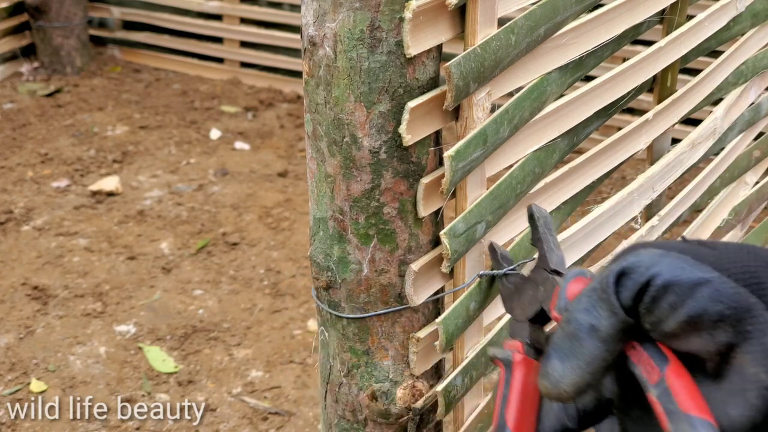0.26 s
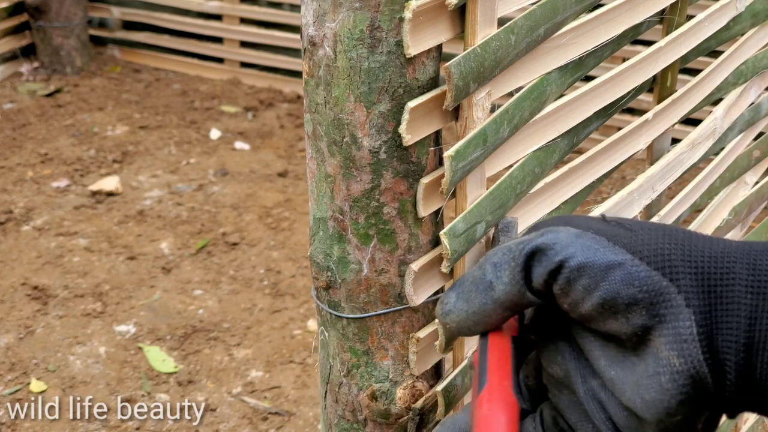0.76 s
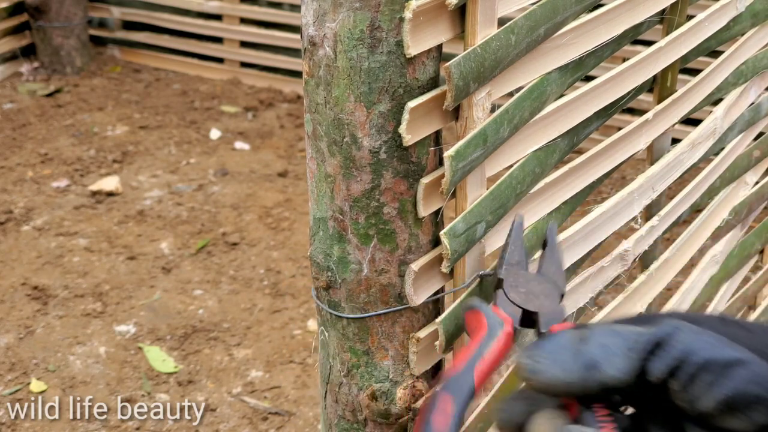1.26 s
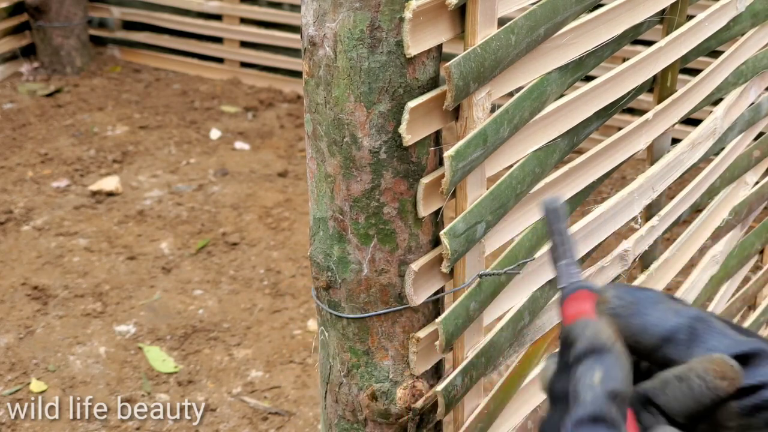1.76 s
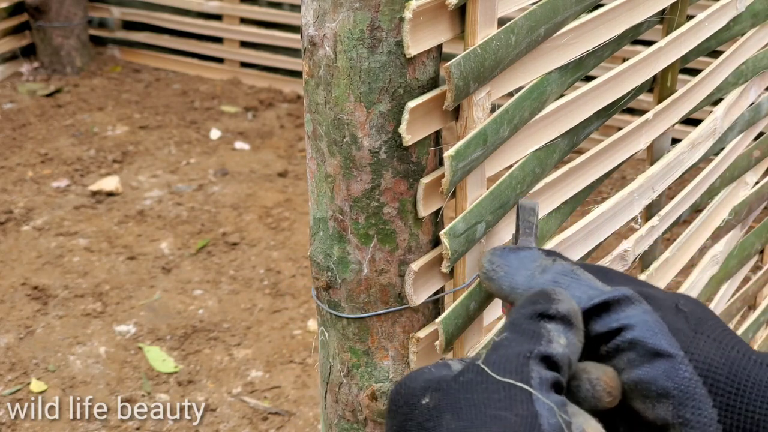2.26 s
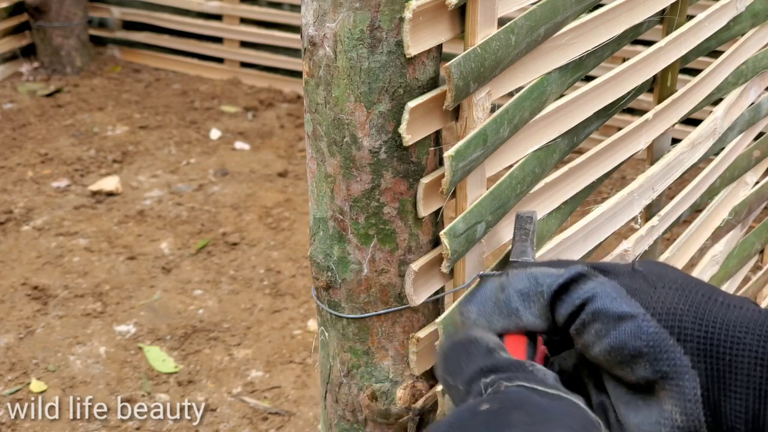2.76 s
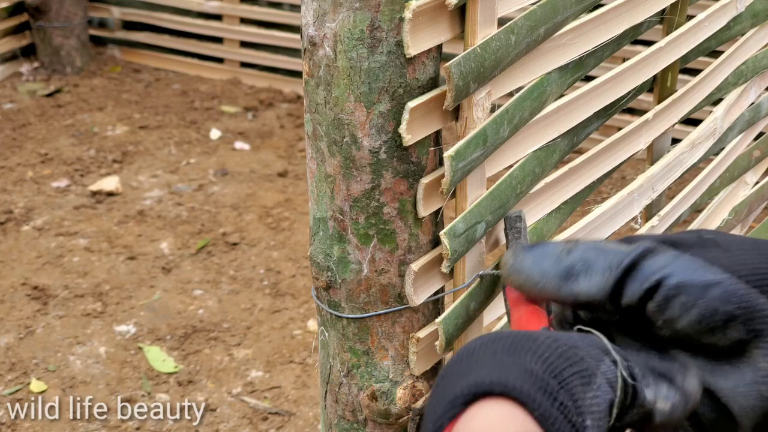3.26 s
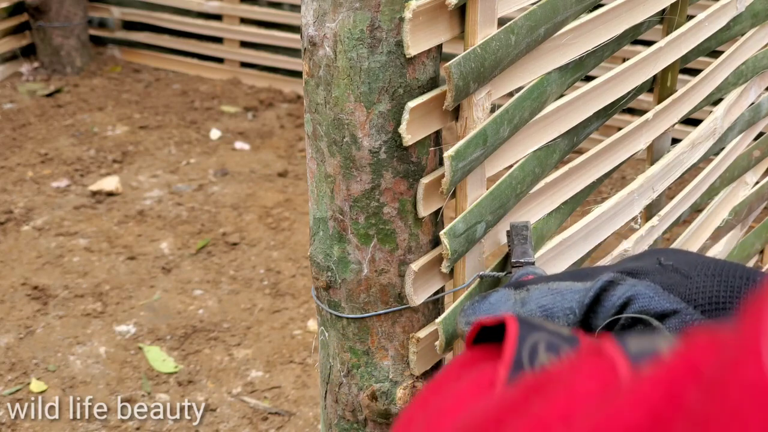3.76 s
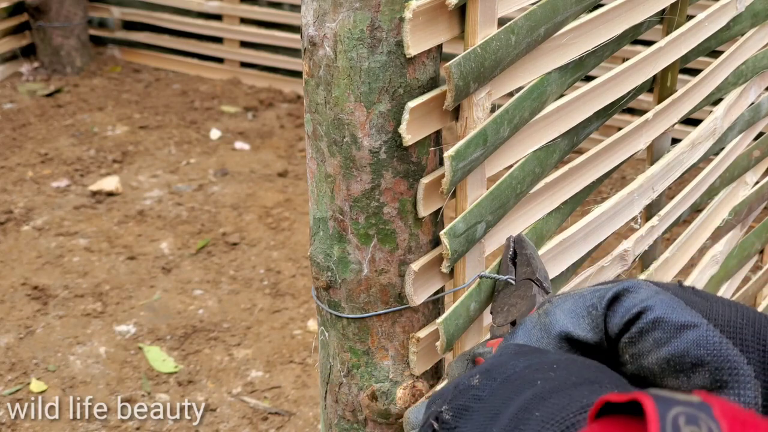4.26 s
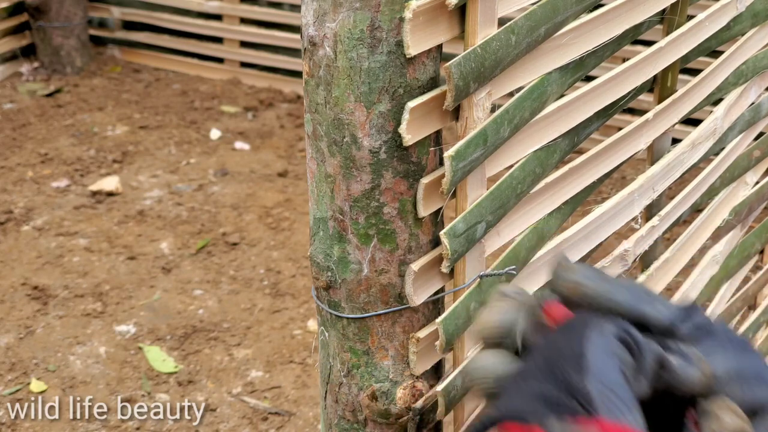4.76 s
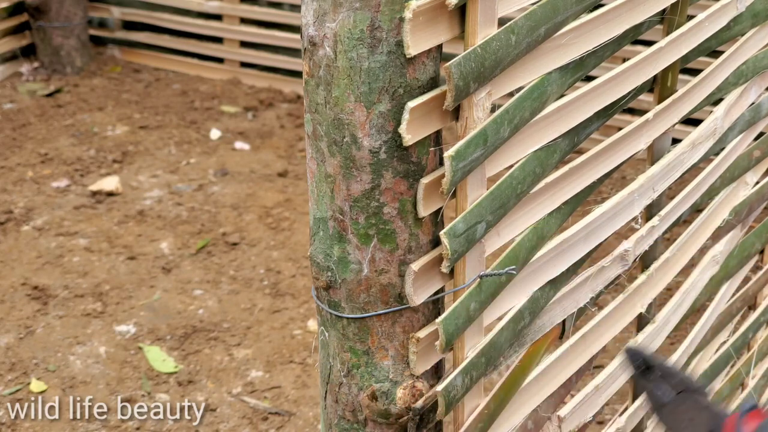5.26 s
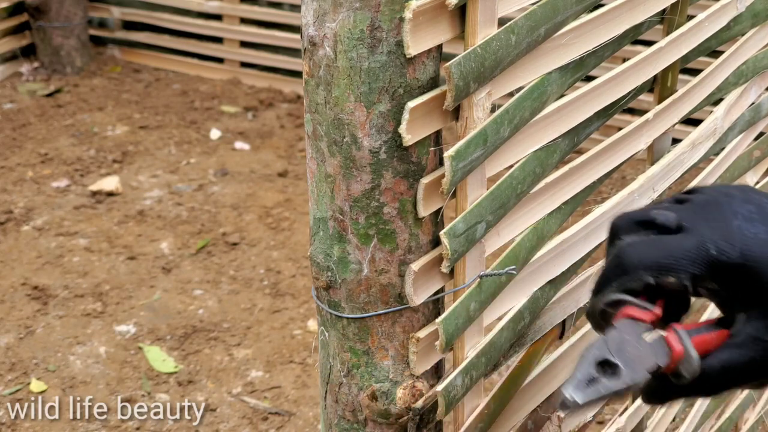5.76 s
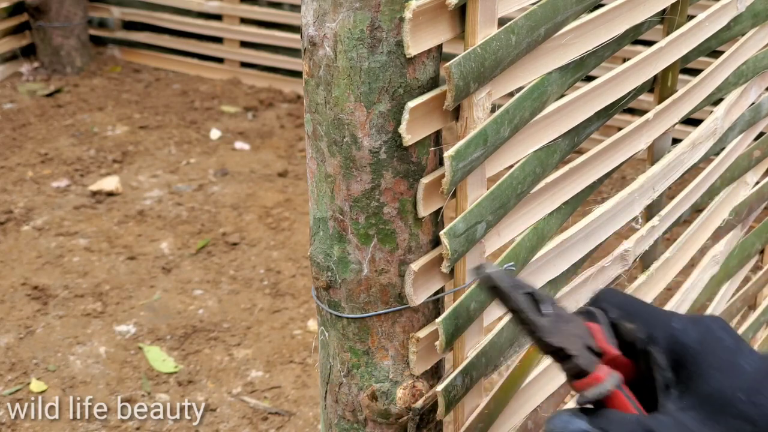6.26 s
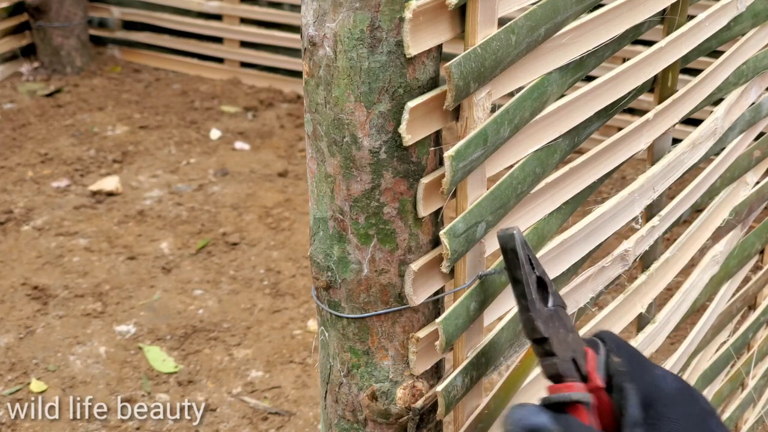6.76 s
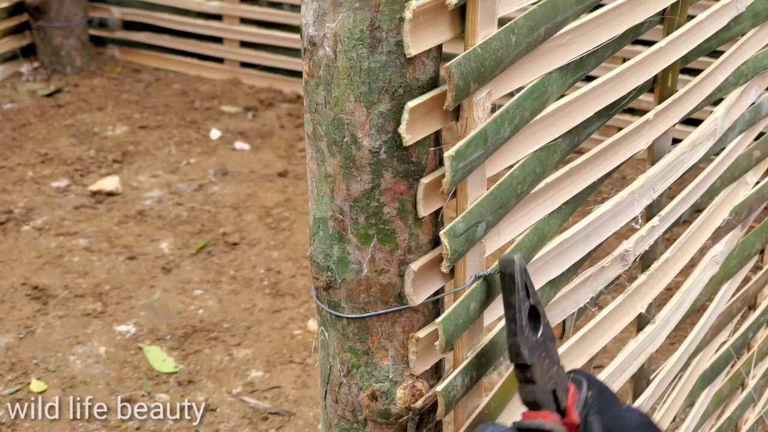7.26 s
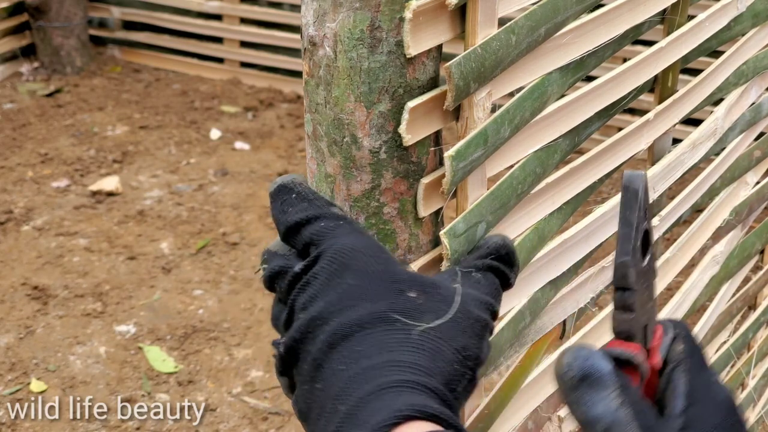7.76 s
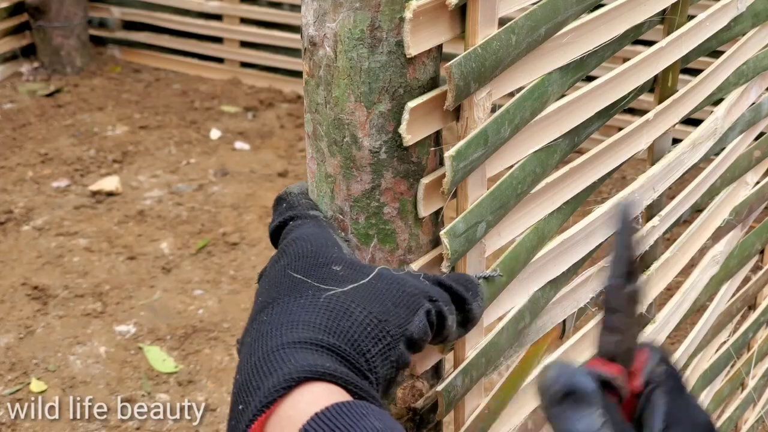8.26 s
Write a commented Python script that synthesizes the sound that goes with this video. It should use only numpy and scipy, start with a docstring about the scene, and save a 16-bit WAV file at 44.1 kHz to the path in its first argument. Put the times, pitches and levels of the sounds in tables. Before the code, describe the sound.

Faint metallic wire-twisting ticks and glove rubs, two bright snaps, a pause, then bouncing plier taps on hollow bamboo, with crickets behind.

```python
"""Outdoors, by a tree trunk: pliers grip and twist steel wire that ties a split-bamboo panel to the tree,
slip off with two clicks, then tap the twisted end down; taps bounce, clack on the slats and thud the panel.
Each contact mixes ringing tones with noise sent through resonances of bamboo and steel.
Gloves rub on the handles as crackling, coloured noise, and soft low pushes stir the panel.
Two crickets and a far bird chirp with short sagging tones in the steady hiss of shaped noise."""
import sys
import numpy as np
from scipy import signal
from scipy.fft import rfft, irfft, next_fast_len
from scipy.io import wavfile
from scipy.ndimage import map_coordinates

SR = 44100
rng = np.random.default_rng(int(sys.argv[2]) if len(sys.argv) > 2 else 0)


def dump_mix(stems):
    """Bounce the given channels to the path in sys.argv[1] as a 16-bit WAV at rate SR."""
    frames = np.atleast_2d(stems).T  # one column per channel
    limited = np.clip(frames, -1, 1)  # hard clip at full scale
    pcm = np.round(limited * 32767).astype(np.int16)
    wavfile.write(sys.argv[1], SR, pcm)


N = 375273  # length of the scene [samples]
AGE = np.arange(SR * 45 // 100) / SR  # time since a contact began [s]

# Outdoor hiss: (frequency [Hz], level [dB per Hz, relative])
AIR_COLOUR = [(25, -22), (50, -8.5), (102, -1.5), (145, -10), (250, -11.5), (400, -7), (560, -9.5),
              (780, -6), (1080, -9.5), (1550, -5.5), (2900, -8.5), (4400, -13), (9000, -24.5),
              (15500, -25.5)]
# How alike the surrounding hiss is at left and right: (frequency [Hz], likeness [-1 to 1])
AIR_ALIKE = [(60, 0.62), (130, 0.87), (290, 0.65), (640, 0.27), (1400, 0.02), (15000, 0.01)]
# Part of the hiss that comes from the right: (frequency [Hz], share of energy [0-1])
FROM_RIGHT = [(100, 0.086), (400, 0.66), (900, 0.64), (1300, 0.24), (2400, 0.12), (3500, 0.074),
              (9000, 0.034)]
AIR_DB, AIR_DRIFT_DB = -56.5, -0.14  # middle level and size of its slow drift [dB]
LEFT_LAG_S = 0.00038  # sound from the right reaches the left microphone this late [s]

# Bouts of cricket chirps: (start [s], end [s], chirp rate [per s], pitch [Hz], relative level [dB])
CRICKETS = [(.082, 4.12, 11.255, 5160, 0), (.043, 4.05, 12.36, 5050, -4), (4.165, 8.5, 12.46, 5050, -4),
            (5.95, 8.5, 11.27, 5160, -2)]
# Peeps of a far bird: (middle time [s], pitch [Hz], level before fading in and out [dB])
BIRD_PEEPS = [(5.628, 3450, -61), (6.05, 3220, -59.5), (6.81, 3400, -57.5), (7.78, 3250, -59)]

# The gloved hand leans on the panel:
# (middle time [s], half length [s], level before fading in and out [dB])
BUMPS = [(.135, 0.05, -57), (1.965, 0.066, -52), (4.73, .07, -57)]

# In the contact tables, strength is energy spread over 20 ms, before the small offsets of each sound.
# "Give" is the part that shoves the panel, "bite" the part that snaps the wire; both add to the strength.
# The jaws close on the wire and twist it:
# (time [s], strength [dB], give [dB], bite [dB], note of the jaws [Hz])
GRIPS = [(.101, -63, 4, -3.5, 2780), (.277, -62, -1, -17, 3490), (.293, -65, 1, 10, 3500),
         (.47, -57.5, -5, -10, 3270), (.585, -53, -7.5, 5.5, 3230), (1.172, -70.5, 11, 5, 3130),
         (1.244, -57.5, -14, 4, 2840), (1.269, -56, -28, 2.5, 3230), (1.342, -56, -30, -17, 3960),
         (1.519, -65, 0, -12, 2810), (1.836, -64, -19, 0, 3100), (1.854, -59.5, -12, -9, 3740),
         (1.909, -57.5, -5, -14, 2880), (1.934, -64, 11, -16, 3050)]
# The pliers slip off the wire twice, then tap it down:
# (time [s], strength [dB], give [dB], bite [dB], note of the slat [Hz], its share of the clack [0-1],
#  note of the jaws [Hz], note of the wire [Hz], left over right level of the steel [dB])
STRIKES = [(4.477, -40, -20, -0.5, 1433, 0.59, 2800, 5400, 5),
           (4.6815, -35.5, -20, 0, 1796, 0.52, 3370, 11800, 3.5),
           (5.843, -40.5, -19, -6, 1850, 0.02, 3900, 5400, -0.5),
           (6.177, -37.5, -19, -4, 1850, 0.23, 2830, 7100, -1),
           (6.435, -33, -1.5, 1, 1040, 0.13, 2970, 5580, 3.5),
           (6.688, -31, -22, -8, 930, 0.37, 2620, 12000, -1.5),
           (6.939, -36, -6.5, 0, 960, 0.08, 2740, 11100, 1),
           (7.2132, -37, -8, -10, 697, 0.33, 2880, 8950, 2),
           (7.832, -35, -0.5, -8.5, 836, 0.56, 3080, 6950, 4),
           (8.1029, -34, 5, -3.5, 690, 0.12, 2760, 5700, 4),
           (8.358, -35.5, 5.5, -2.5, 694, 0.3, 3330, 6400, 7)]
# The pliers bounce and land again:
# (time [s], strength [dB], give [dB], bite [dB], note of the slat [Hz], its share of the clack [0-1])
REBOUNDS = [(5.8879, -38, -9.5, -25, 763, 0.65), (6.19, -41.5, -6.5, -23, 1910, 0.3),
            (6.2193, -38.5, -7.5, -8, 694, 0.43), (6.457, -46, -0.5, 2, 720, 0.46),
            (6.473, -38.5, -13, 0, 1800, 0.74), (6.512, -42, -37, 3, 1630, 0.13),
            (6.696, -38.5, -26, 8.5, 1680, 0.75), (6.705, -38.5, -11.5, 7.5, 1150, 0.14),
            (6.7745, -47, -12.5, -5, 743, .34), (6.952, -38, 0.5, 0, 1907, .3),
            (7.006, -56.5, 0, 0.5, 1920, 0.55), (7.032, -62.5, -5, -1, 1840, 0.5),
            (7.272, -51.5, -5, 2, 1800, 0.3), (7.865, -38, -6, -7, 1710, .55),
            (8.118, -42.5, 5.5, -0.5, 1400, 0.53), (8.374, -42, -12, -1.5, 700, 0.3)]
GRIP_SLAT_HZ, GRIP_NOTE_SHARE, GRIP_WIRE_HZ, GRIP_PAN_DB = 770, 0.24, 6670, 2.5
REBOUND_JAW_HZ, REBOUND_WIRE_HZ, REBOUND_PAN_DB = 2704, 10150, 1.7

# The more the panel gives, the more bamboo and the less steel one hears:
# (level over the strength [dB], change for each dB of give [dB])
KNOCK, CLACK, RING = (-0.59, 0.77), (2.3, 0.18), (-1.65, -.15)
# A square hit (all in the slat's note) has this much more clack and less ring than a glancing one
SQUARE_DB = 5.5

# Sway of the whole panel: (frequency [Hz], relative level [dB], time to fade by 60 dB [s])
PANEL_SWAY = [(47, -24, 0.83), (67.3, -7.5, 0.25), (97.4, -19.5, 1), (124, 0, 0.23), (139.5, -2.5, 0.27),
              (165.6, -8, 0.27), (190, -7, 0.1)]
# Bending of the slats: (frequency [Hz], relative level [dB], time to fade by 60 dB [s])
SLAT_BENDING = [(201, -9, 0.11), (235, -2.5, 0.093), (263, -11.5, 0.32), (325, 4, 0.032),
                (362.3, 5.5, 0.13), (438, -13.5, 0.26), (490, -4.5, 0.23), (547, -10, 0.11),
                (586, -3.5, 0.14)]
# Bamboo resonances, before the slat's note tilts them: (frequency [Hz], width [Hz], relative level [dB])
BAMBOO = [(723, 88, -1), (976, 305, 2), (1066, 318, 2), (1506, 135, -1), (1935, 88, -4.5)]
# Resonances of the pliers: (frequency [Hz], width [Hz], relative level [dB])
PLIERS = [(2457, 88, -4), (2756, 125, 3.5), (2880, 260, 6), (3334, 45, 6.5), (3470, 2400, -7)]
# Wire resonances, before its note tilts them: (frequency [Hz], width [Hz], relative level [dB])
WIRE = [(4960, 420, -2), (5474, 100, 7), (5800, 1450, -1), (7320, 120, -1.5), (7600, 600, 0.5),
        (11700, 7800, -3), (12100, 570, -5.5), (14100, 570, -49)]
# Thin after-ring of the steel: (frequency [Hz], relative level [dB], time to fade by 60 dB [s])
STEEL_PING = [(2625, 2.5, 0.056), (2960, 5, 0.04), (5590, -0.5, 0.05), (6961, -3, 0.062),
              (10920, -7, 0.035), (11740, -8, 0.07), (11800, -9, 0.028), (12500, -3, 0.036)]

# Glove and jaws sliding: (middle time [s], half length [s], level before fading in and out [dB],
#  tilt of the colour [dB per octave])
RUBS = [(0.294, 0.1, -58.5, -1), (0.495, 0.072, -60, -1), (0.552, 0.084, -56.5, 3.5),
        (1.258, 0.063, -49, 1.5), (1.344, 0.05, -56, 0), (1.944, 0.088, -59.5, -1),
        (2.177, .13, -54.5, -0.5), (3.122, 0.053, -55.5, 1), (5.02, .12, -63, 1),
        (5.278, 0.24, -60.5, -2.5), (7.27, 0.054, -47, 0), (7.613, 0.084, -63, 1), (8.153, 0.062, -56.5, 3)]
# Sound of the sliding before the tilt: (frequency [Hz], level [dB per Hz, relative])
RUB_COLOUR = [(200, -17), (750, 0.5), (2800, -2.5), (6000, -7.5), (9000, -14), (13000, -13), (16000, -35)]
RUB_CRACKLE_DB = 2.5  # unevenness of the slips [dB]

# Faint tail returned by fences and trees: (frequency [Hz], time to fade by 60 dB [s])
YARD = [(100, 0.29), (500, 0.13), (3000, 0.18), (12000, 0.17)]
TOP_HZ = 15900  # upper limit of the sound [Hz]


def amp(db):
    """Turn decibels into a plain multiplier."""
    return 10 ** (np.asarray(db) / 20)


def unit(x):
    """Scale to an average strength (rms) of 1."""
    return x / np.sqrt(np.mean(x ** 2) + 1e-20)


def burst(x, db):
    """Scale so that the energy, spread over 20 ms, has this level."""
    return amp(db) * unit(x) * np.sqrt(SR / 50 / x.shape[-1])


def along(points, hz):
    """Read a curve of (frequency, value) points on a logarithmic pitch axis."""
    f, value = np.transpose(points)
    return np.interp(np.log(hz + 1), np.log(f + 1), value)


def wobble(rate):
    """Make a smooth random curve with this many random points a second."""
    points = rng.standard_normal(int(N * rate / SR) + 4)
    return map_coordinates(points, [np.arange(N) * rate / SR])


def filtered(x, response):
    """Strengthen, weaken or delay each frequency of x as the response says."""
    n = x.shape[-1]
    padded = next_fast_len(n + SR // 20, real=True)  # spare room for the ringing
    spectrum = rfft(x, padded) * response(np.fft.rfftfreq(padded, 1 / SR))
    return irfft(spectrum, padded)[..., :n]


def highpass(x, low_hz):
    """Weaken what lies below low_hz."""
    return signal.sosfilt(signal.butter(2, low_hz, "high", fs=SR, output="sos"), x)


def resonate(x, modes, low_hz):
    """Send x through resonances that radiate little below low_hz."""
    def body(f):
        total = 0
        for k, (centre, width, db) in enumerate(modes):
            peak = 1j * f * width / (centre * centre - f * f + 1j * f * width)
            total = total + (-1) ** k * amp(db) * peak  # neighbours move in opposite directions
        return total
    return highpass(filtered(x, body), low_hz)


def add(track, s, x):
    """Mix x into the track from time s."""
    i = max(round(s * SR), 0)
    track[:, i:i + x.shape[-1]] += x[..., :max(N - i, 0)]


def pair(n, alike):
    """Make white noise at two microphones, partly shared."""
    turn = np.arccos(np.clip(alike, -1, 1)) / 2
    mid, side = rng.standard_normal((2, n)) * [[np.cos(turn)], [np.sin(turn)]]
    return np.array([mid + side, mid - side])


def air():
    """Far hiss over a soft rumble; part of the hiss comes from the right and reaches the left late."""
    def spread(hz):
        turn = np.arccos(np.clip(along(AIR_ALIKE, hz), -1, 1)) / 2
        share = np.clip(along(FROM_RIGHT, hz), 0, 1)
        around, direct = np.sqrt(1 - share), np.sqrt(share)
        late = np.exp(-2j * np.pi * hz * LEFT_LAG_S)
        paths = np.array([around * np.cos(turn), around * np.sin(turn), direct * late, direct])
        return amp(along(AIR_COLOUR, hz)) * paths
    a, b, far = rng.standard_normal((3, N))
    mid, side, left, right = filtered(np.array([a, b, far, far]), spread)
    hiss = unit(np.array([mid + side + left, mid - side + right]))
    hiss = hiss * amp(AIR_DB + AIR_DRIFT_DB * wobble(5.3))
    rumble = unit(resonate(pair(N, alike=0.63), [(105.5, 19, 0)], low_hz=61.6))
    rumble = rumble * amp(-72 + 0.5 * wobble(3.12))
    return hiss + rumble


def chirp(hz, length, rasp):
    """A short tone sags in pitch; leaves scatter it on its way to each microphone."""
    t = np.arange(int(length * SR)) / SR
    sagging_hz = hz * (1 + .05 * (.5 - t / length))
    phase = 2 * np.pi * np.cumsum(sagging_hz) / SR
    scatter = signal.resample(rng.standard_normal((2, 9)), len(t), axis=1)
    tone = np.sin(phase + rasp * scatter + rng.uniform(-0.28, 1, (2, 1)))
    return unit(tone) * np.hanning(len(t))


def wildlife(cricket_db=-61):
    """Two crickets stroke their wings at slightly different rates; a bird peeps far off."""
    out = np.zeros((2, N))
    stroke, peep = .038, .06  # lengths [s]
    for start, end, rate, hz, db in CRICKETS:
        for s in np.arange(start, end, 1 / rate):
            level = amp(cricket_db + db + rng.normal(0, 1))
            add(out, s - stroke / 2, level * chirp(hz, stroke, rasp=0.67))
    for s, hz, db in BIRD_PEEPS:
        add(out, s - peep / 2, amp(db) * chirp(hz, peep, rasp=1.2))
    return out


def bumps():
    """A soft push, made of noise, stirs only the low resonances of the panel."""
    out = np.zeros((2, N))
    for s, half, db in BUMPS:
        n = int(2 * half * SR)
        stir = resonate(pair(n, alike=.95), [(129, 41, 3.5), (217, 50, -9.5)], low_hz=110)
        add(out, s - half, amp(db) * unit(stir) * np.hanning(n))
    return out


def chatter(bite, rattle_db, rattle_t60, tail_db, tail_t60, alike):
    """The force of a contact: a hard bite, the uneven rattle of wire on slats, a fading buzz."""
    knots = AGE[::40]
    jolts = np.interp(AGE, knots, rng.standard_normal(len(knots)))
    hit = (AGE / bite * np.exp(1 - AGE / bite)) ** 2  # peaks after "bite" seconds
    fading = amp(rattle_db - 60 * AGE / rattle_t60) + amp(tail_db - 60 * AGE / tail_t60)
    rattle = fading * (1 - np.exp(-AGE / bite))
    return (hit * pair(len(AGE), alike) + rattle * pair(len(AGE), alike / 2)) * amp(2 * jolts)


def swing(modes, attack, scatter_db):
    """Fading tones take new strengths and slightly new pitches for each blow."""
    hz, db, t60 = np.transpose(modes)[:, :, None]
    size, detune = rng.standard_normal((2, len(modes), 1))
    fade = amp(db + scatter_db * size - 60 * AGE / t60)
    waves = fade * np.sin(2 * np.pi * hz * (1 + 0.021 * detune) * AGE)
    return waves.sum(0) * (1 - np.exp(-AGE / attack))


def shove(rise):
    """One push and rebound of the wood, without ring."""
    u = AGE / rise
    return u * (2 - u) * np.exp(-u)


def wood(thud_db, knock_db, clack_db, slat_hz, note_share):
    """The struck slat clacks, its neighbours knock and the whole panel thuds."""
    sway = burst(swing(PANEL_SWAY, attack=0.012, scatter_db=3.5), thud_db - .5)
    # loose slats jostle one another while the panel sways
    jostle = chatter(bite=0.0072, rattle_db=-13, rattle_t60=0.22, tail_db=-8.0, tail_t60=0.22, alike=1.0)
    thud = sway + burst(resonate(jostle, [(145, 63, 0)], low_hz=80.5), thud_db - 4.0)

    bend = burst(swing(SLAT_BENDING, attack=0.0012, scatter_db=7.5), knock_db - 4.5)
    push = burst(shove(rise=0.00092), knock_db - 5.0)
    loose = chatter(bite=0.0042, rattle_db=0.5, rattle_t60=0.15, tail_db=-5.5, tail_t60=0.23, alike=0.98)
    knock = burst(resonate(loose, [(353, 170, 1), (595, 530, 0.9)], low_hz=223), knock_db - 4.5)

    # a short slat answers higher
    tilt = 6 * np.log2(slat_hz / 1150)  # dB per octave
    slats = [(hz, width, db + tilt * np.log2(hz / 1150)) for hz, width, db in BAMBOO]
    force = chatter(bite=0.0015, rattle_db=-14.5, rattle_t60=0.083, tail_db=-8, tail_t60=0.08, alike=0.74)
    # a clean hit leaves more energy in the slat's own note
    share = np.clip(note_share, 0, 1)
    clack = np.sqrt(1 - share) * burst(resonate(force, slats, low_hz=675), clack_db)
    note_modes = [(slat_hz, 0, 44 / slat_hz), (slat_hz * 1.094, -6, 32 / slat_hz)]
    note = burst(swing(note_modes, attack=0.00021, scatter_db=3), clack_db - .5)

    low_sounds = (thud + bend + push + knock) * amp([[-.6], [.6]])  # a little to the right
    return low_sounds + clack + np.sqrt(share) * note


def steel(ring_db, snap_db, jaw_hz, wire_hz):
    """Jaws meet wire: the point of contact favours one note of the pliers and one of the wire."""
    jaws = chatter(bite=0.0013, rattle_db=-11.5, rattle_t60=0.043, tail_db=4, tail_t60=0.041, alike=0.67)
    ring = burst(resonate(jaws, PLIERS, low_hz=1850), ring_db - 5.0)
    ring = ring + burst(resonate(jaws, [(jaw_hz, 180, 0)], low_hz=1800), ring_db - 3.0)

    # a higher wire note comes with a brighter snap
    tilt = -6.5 + 21 * np.log2(wire_hz / 8000)  # dB per octave
    wire = [(hz, width, db + tilt * np.log2(hz / 6500)) for hz, width, db in WIRE]
    tip = chatter(bite=0.0013, rattle_db=-7.0, rattle_t60=0.046, tail_db=-31, tail_t60=0.12, alike=0.14)
    snap = burst(resonate(tip, wire, low_hz=3800), snap_db - 0.5)
    snap = snap + burst(resonate(tip, [(wire_hz, wire_hz / 24, 0)], low_hz=3800), snap_db - 8.5)

    ping = np.array([swing(STEEL_PING, attack=.0003, scatter_db=3) for ear in "LR"])
    return ring + snap + burst(ping, snap_db - 5.5)


def contact(strength_db, give_db, bite_db, slat_hz, note_share, jaw_hz, wire_hz, pan_db):
    """One contact shares its strength between the bamboo and the steel."""
    knock_db, clack_db, ring_db = (strength_db + db + slope * give_db for db, slope in (KNOCK, CLACK, RING))
    square_db = SQUARE_DB * (note_share - .5)
    metal = steel(ring_db - square_db, strength_db + bite_db, jaw_hz, wire_hz)
    bamboo = wood(strength_db + give_db, knock_db, clack_db + square_db, slat_hz, note_share)
    return metal * amp([[pan_db / 2], [-pan_db / 2]]) + bamboo


def blows():
    """The pliers grip, strike and rebound, and each contact sounds both wood and steel."""
    out = np.zeros((2, N))
    for s, *touch, jaw_hz in GRIPS:
        add(out, s, contact(*touch, GRIP_SLAT_HZ, GRIP_NOTE_SHARE, jaw_hz, GRIP_WIRE_HZ, GRIP_PAN_DB))
    for s, *touch in STRIKES:
        add(out, s, contact(*touch))
    for s, *touch in REBOUNDS:
        add(out, s, contact(*touch, REBOUND_JAW_HZ, REBOUND_WIRE_HZ, REBOUND_PAN_DB))
    # the open slats radiate hardly any deep bass
    return highpass(out, 50)


def rubs():
    """Tiny slips of uneven size crowd together as glove and jaws slide."""
    out = np.zeros((2, N))
    for s, half, db, tilt in RUBS:
        n = int(2 * half * SR)
        sizes = np.repeat(rng.standard_normal(n), 40)[:n]  # each size lasts 40 samples
        slips = pair(n, alike=0.35) * amp(RUB_CRACKLE_DB * sizes)

        def colour(hz):
            octaves = np.log2(np.maximum(hz, RUB_COLOUR[0][0]))
            return amp(along(RUB_COLOUR, hz) + tilt * octaves)
        add(out, s - half, amp(db) * unit(filtered(slips, colour)) * np.hanning(n) ** 2)
    return out


def yard(x):
    """Fences and trees return a faint tail, made of noise that fades at its own pace in each pitch range."""
    hz, t, z = signal.stft(rng.standard_normal((2, SR // 2)), SR, nperseg=256)
    fade = amp(-60 * t / along(YARD, hz)[:, None])
    tail = signal.istft(z * fade, SR, nperseg=256)[1]
    return signal.fftconvolve(x, tail / np.linalg.norm(tail[0]), axes=1)[:, :N]


def scene():
    """The work close by, the outdoors behind it."""
    work = blows() + rubs() + bumps()
    return work + amp(-16.5) * yard(work) + wildlife() + air()


def record(dry):
    """A very steep filter removes what lies above the upper limit."""
    return filtered(dry, lambda hz: 1 / np.sqrt(1 + (hz / TOP_HZ) ** 200))


dry = scene()
out = record(dry)
dump_mix(out)
```